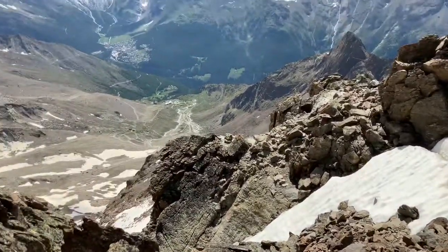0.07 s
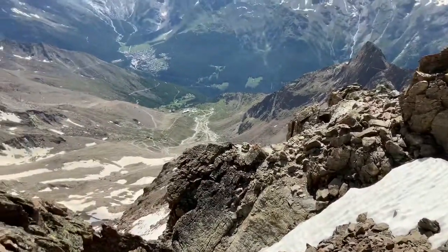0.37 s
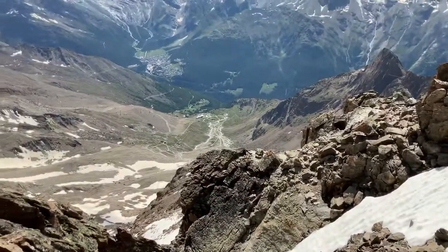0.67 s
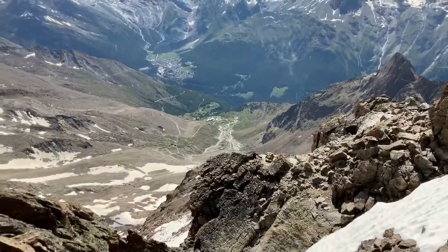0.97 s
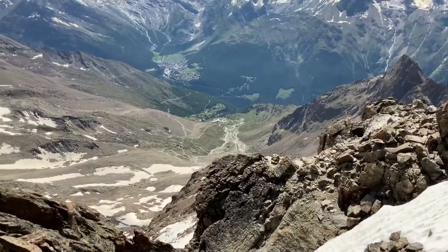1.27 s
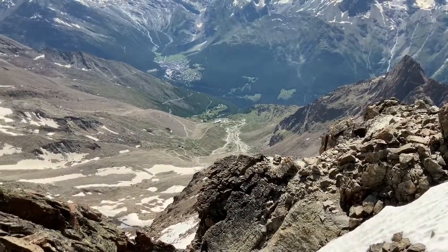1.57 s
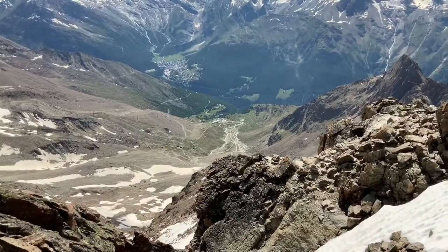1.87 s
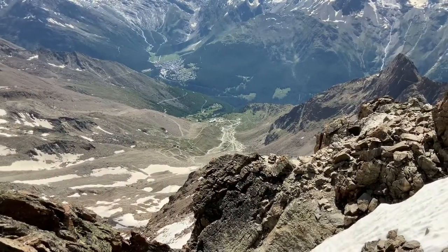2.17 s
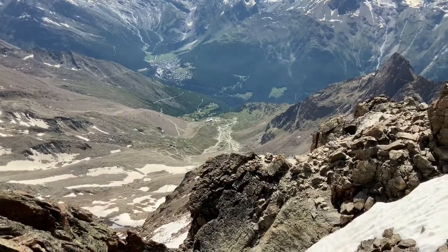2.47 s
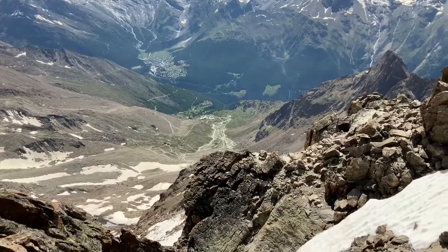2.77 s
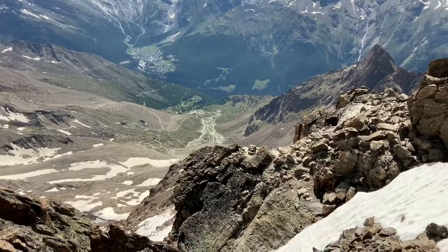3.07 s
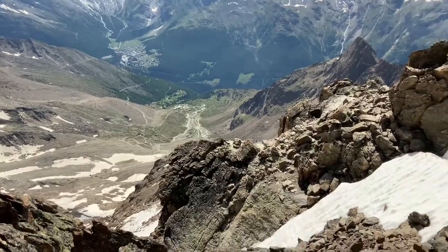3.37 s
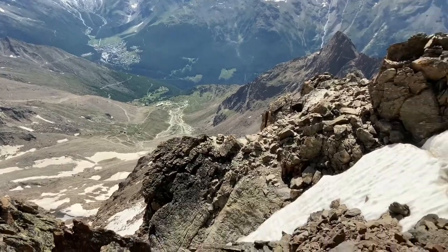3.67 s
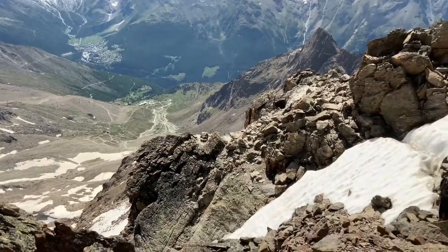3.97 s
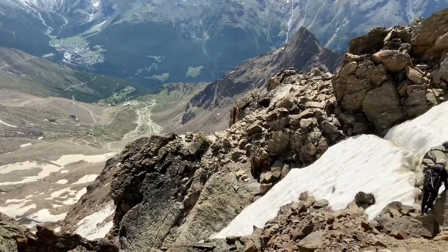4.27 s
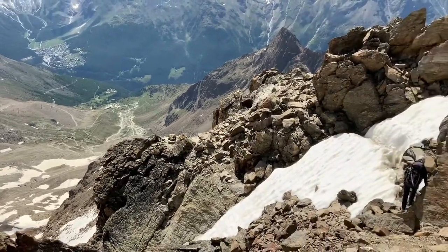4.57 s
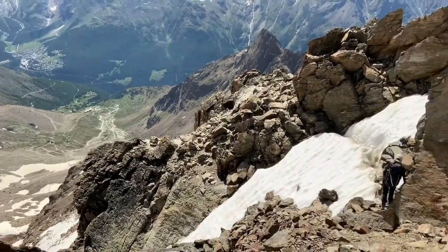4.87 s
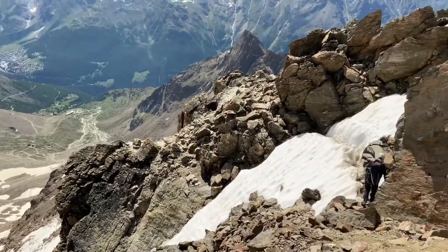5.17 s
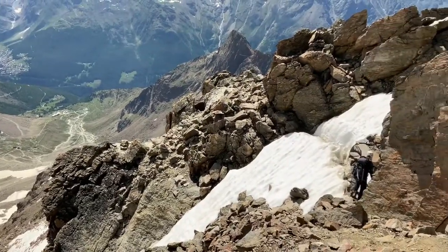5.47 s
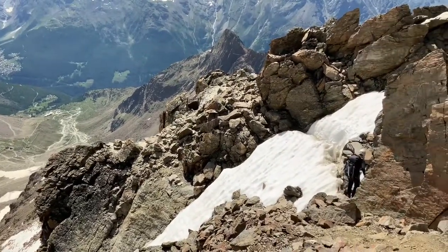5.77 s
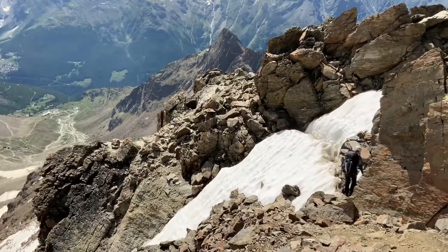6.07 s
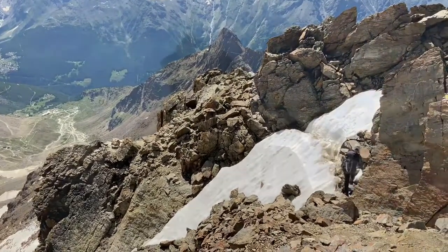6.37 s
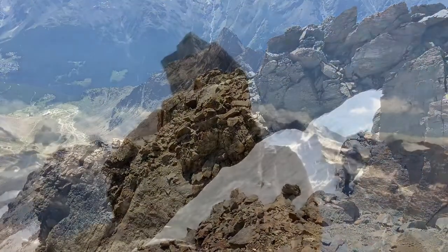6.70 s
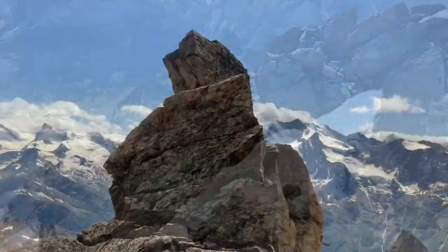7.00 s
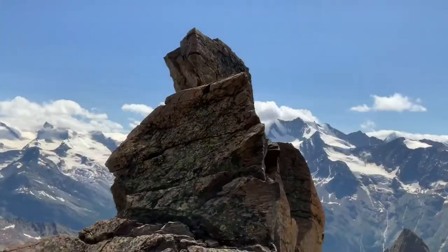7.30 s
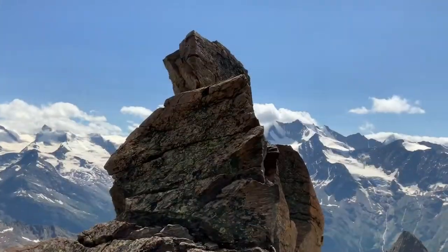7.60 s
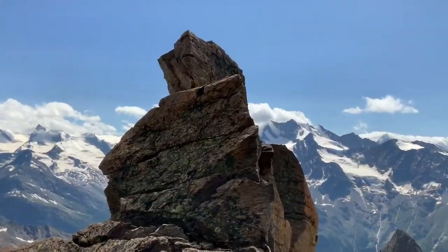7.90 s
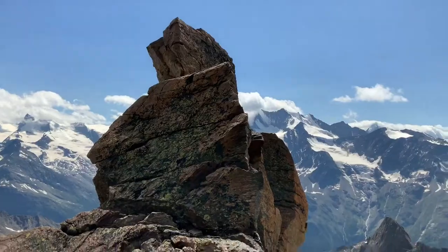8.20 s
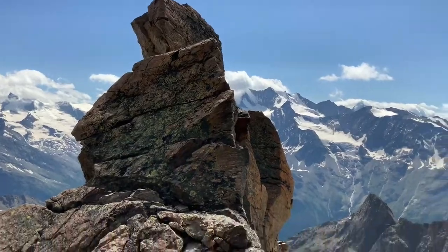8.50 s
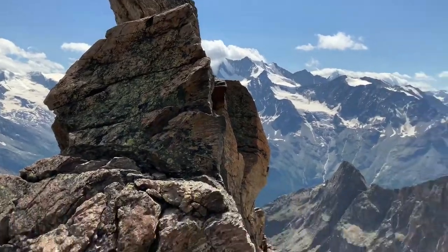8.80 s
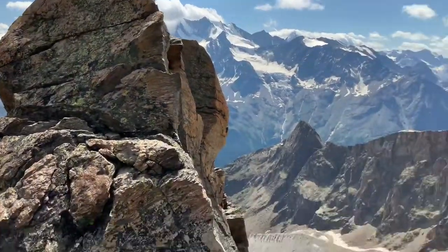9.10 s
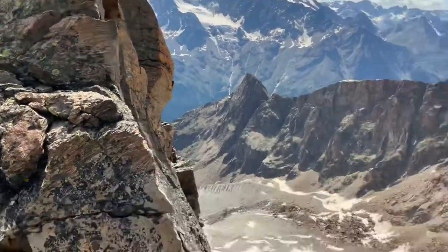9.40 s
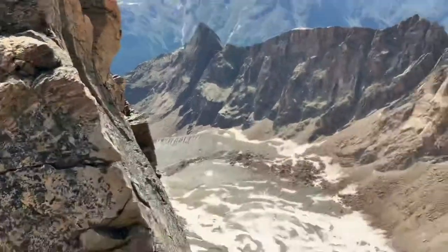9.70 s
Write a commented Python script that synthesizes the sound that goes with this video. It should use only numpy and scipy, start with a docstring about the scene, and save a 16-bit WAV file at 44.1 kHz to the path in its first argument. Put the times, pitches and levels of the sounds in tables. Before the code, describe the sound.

Quiet distant wind with soft taps and sleeve rustle, then gusts suddenly hit the microphone with a lumpy, thumping rumble.

```python
"""A high rocky ridge in the wind, heard through the two microphone ports of a small hand-held camera.
First there is shelter: a far wash of air, soft puffs, a sleeve sliding on itself, a hand rubbing and
knocking on the casing. After six seconds the wind reaches the ports and gusts strike them: eddies make
a lumpy rumble with deep thumps and sudden gaps, and the fastest flow tears into short rasps."""
import sys
import numpy as np
from scipy import signal
from scipy.fft import rfft, irfft
from scipy.io import wavfile
from scipy.ndimage import uniform_filter1d

SR = 44100
rng = np.random.default_rng(int(sys.argv[2]) if len(sys.argv) > 2 else 0)


def master_out(mix):
    """Clip the mix to full scale and print it as 16-bit PCM to the path in sys.argv[1]."""
    frames = np.transpose(np.atleast_2d(mix))
    ceiling = np.clip(frames, -1, 1)
    pcm = np.round(ceiling * 32767).astype(np.int16)
    wavfile.write(sys.argv[1], SR, pcm)


N = 434385
T, HZ = np.arange(N) / SR, np.fft.rfftfreq(N, 1 / SR)

# tone of the flow tearing off the casing: (frequency [Hz], level [dB])
TEAR_SPECTRUM = [(80, -24), (450, 7.5), (630, 11), (790, 4), (950, -1.5), (1100, -4), (1270, -13.5),
                 (1450, -15.5), (1720, -20.5), (2150, -30), (2650, -35.5), (3200, -55), (5000, -72),
                 (12000, -91.5)]
# light air in the shelter: (time [s], slow eddies [dB], roar beyond the rocks [dB])
LIGHT_AIR = [(0, -47.5, -70), (1.1, -53.5, -63), (1.55, -54, -71), (1.82, -47, -63.5), (2.15, -53, -70.5),
             (2.65, -60.5, -63.5), (3.2, -52, -60), (3.7, -65, -64.5), (5, -80, -61), (6.1, -81, -63)]


def buffeting(churn_db=-4, tear_db=-19, flick_db=-17, steepness=1.29, lull_s=0.014):
    """Wind and gusts drive eddies of three sizes on the ports; the smallest grow fastest with the flow."""
    # steady push of the wind: (time [s], level [dB])
    push = [(6.15, -52), (6.25, -42.5), (6.53, -28), (6.66, -31.5), (6.85, -22), (7.36, -29), (7.85, -23),
            (7.98, -30), (8.2, -25.5), (8.4, -23), (8.68, -28), (9.62, -27), (9.85, -34.5)]
    # gusts striking the ports: (time [s], peak [dB], length [s], hollow body against rumble [dB])
    gusts = [(6.403, -31, 0.031, -1), (6.479, -36.5, 0.019, 7.5), (6.631, -32, 0.0081, 19.5),
             (6.691, -21.5, 0.037, 6), (6.819, -17, 0.039, 1), (6.868, -14.5, 0.03, -5),
             (6.979, -13.5, 0.009, 2.5), (7.015, -23, 0.037, 6.5), (7.119, -19.5, 0.03, 4),
             (7.163, -17, 0.021, 0), (7.27, -18, 0.043, -8), (7.44, -16, 0.011, -0.5),
             (7.522, -16.5, 0.051, -2), (7.702, -25, 0.0055, 8), (7.759, -19.5, 0.045, 1.5),
             (7.847, -23.5, 0.085, -2), (8.152, -26, 0.049, -15.5), (8.248, -14, 0.0086, 1),
             (8.345, -31.5, 0.051, 3), (8.407, -19, 0.01, 0.5), (8.467, -24, 0.02, 8),
             (8.572, -18, 0.11, -8.5), (8.659, -24.5, 0.047, -2.5), (8.906, -23, 0.052, 2),
             (9.074, -31.5, 0.071, 4.5), (9.285, -17.5, 0.018, -17), (9.4, -24.5, 0.068, -6.5),
             (9.745, -20, 0.052, -9)]
    # the flow lifts off the ports and leaves a gap: (time [s])
    lulls = [6.585, 6.765, 6.935, 7.075, 7.214, 7.335, 7.394, 7.595, 7.965, 8.072, 8.216, 8.613, 8.76,
             8.834, 9.131, 9.656]
    # rumble of the large eddies: (frequency [Hz], level [dB])
    rumble_spectrum = [(12, -11), (22, -9.5), (45, 1.5), (90, 1), (130, -2.5), (190, -8.5), (400, -74),
                       (3000, -130)]
    # hollow body of the medium eddies: (frequency [Hz], level [dB])
    body_spectrum = [(70, -22), (145, -4), (230, -1), (305, -3), (380, -8.5), (480, -16), (700, -31),
                     (4000, -120)]
    wind = amp(follow(push)[0]) * np.clip((T - push[0][0]) * 20, 0, 1)
    gust_rumble, gust_body = bursts(gusts, rise=0.89, fall=0.82)
    fits = abs(flicks())  # between gusts the churn comes in separate puffs
    churn_level = wind * (wind / wind.max()) ** 0.13 * amp(churn_db) * np.sqrt(fits)
    rumble_level, body_level = np.hypot(wind, gust_rumble), np.hypot(churn_level, gust_body)
    peak = body_level.max()
    tear_level = peak * (body_level / peak) ** steepness * amp(tear_db)
    flick_level = peak * (wind / peak) ** steepness * amp(flick_db) * fits

    flutter = wander(rate_hz=41)  # shared by all three sizes
    rumble = ports(tone(rumble_spectrum), right_db=0.5) * amp(3 * flutter)
    body = ports(tone(body_spectrum), right_db=4.5) * amp(4.5 * flutter)
    tear = ports(tone(TEAR_SPECTRUM) * below(1800, order=4), right_db=3.5) * amp(4 * flutter)
    flick_band = below(1200, order=16) * (1 - below(110, order=4))
    flicker = ports(tone(TEAR_SPECTRUM) * flick_band, right_db=-1.1)
    churn = (steadied(body, span_s=0.056) * body_level
             + steadied(tear, span_s=0.0088) * tear_level
             + flicker * flick_level)
    gap = sum(np.exp(-((T - s) / lull_s) ** 2) for s in lulls)
    return steadied(rumble, span_s=0.03) * rumble_level * amp(-1.5 * gap) + churn * amp(-7.5 * gap)


def flicks(per_s=69, flick_s=0.0032, spread_db=5.5):
    """Envelope of small eddies passing in fits: brief flicks of uneven size at random moments."""
    chance, size = rng.random(N), np.minimum(rng.exponential(1, N), 2)
    hits = (chance < per_s / SR) * amp(spread_db * size)
    t = np.arange(2048) / SR
    shape = t * np.exp(-(t / flick_s / 2) ** 2)
    return unit_rms(signal.oaconvolve(hits, shape)[:N])


def thumps(width_octaves=0.26):
    """A large eddy covers both ports at once and lands one deep blow."""
    # single large eddies: (time [s], peak [dB], centre [Hz], length [s])
    blows = [(6.733, -16, 68, 0.012), (6.816, -11, 103.5, 0.023), (6.971, -20, 60.7, 0.027),
             (7.121, -15.5, 312, 0.015), (7.15, -12, 82, 0.0065), (7.175, -4, 138, 0.005),
             (7.284, -19.5, 64, 0.058), (7.435, -16, 62, 0.015), (7.915, -14, 69.8, 0.016),
             (8.245, -16, 139.2, 0.013), (8.275, -11, 49.3, 0.02), (8.397, -13.5, 129, 0.0089),
             (8.482, -18.5, 80, 0.0073), (8.565, -19, 87.4, 0.03), (8.914, -33, 74, 0.023),
             (9.177, -14.5, 56, 0.0084), (9.23, -20.5, 56, 0.018), (9.694, -13, 70.7, 0.017),
             (9.857, -7, 49, 0.022)]
    flow = ports(below(700), right_db=1.5)
    return swells(flow, [(*blow, width_octaves) for blow in blows])


def rasps(dull_db=5, bright_db=-7.5):
    """The fastest eddies tear off the casing in short bursts: a dull body and a top that rings the ports."""
    # tears in the flow: (time [s], peak [dB], length [s], treble against body [dB])
    tears = [(6.41, -47.5, 0.022, -3), (6.526, -25.5, 0.0059, -3), (6.625, -43, 0.16, -1),
             (6.745, -32, 0.0032, -8.5), (6.807, -37, 0.072, 3), (6.865, -28, 0.0082, 17.5),
             (6.971, -40.5, 0.011, -4), (7.117, -33.5, 0.023, -10.5), (7.438, -40, 0.005, -3),
             (7.51, -48.5, 0.014, 12.5), (7.611, -45, 0.0073, -3.5), (7.762, -35.5, 0.012, -10),
             (7.825, -29, 0.015, -12), (7.843, -32.5, 0.0036, 3.5), (7.894, -29.5, 0.0026, -9),
             (8, -35.5, 0.005, -32), (8.033, -46, 0.007, -19), (8.111, -46, 0.0047, -22),
             (8.171, -43, 0.0059, -8), (8.24, -48.5, 0.0029, 5), (8.383, -27.5, 0.0038, -16.5),
             (8.401, -35, 0.013, -11), (8.488, -34, 0.018, -6), (8.636, -32.5, 0.0085, -9),
             (8.663, -34.5, 0.025, -13), (8.702, -37, 0.011, -3.5), (8.803, -37, 0.024, 5),
             (8.882, -22, 0.0072, -3), (8.907, -22.5, 0.011, 0.5), (9.029, -32.5, 0.0023, -26),
             (9.057, -36, 0.024, -7), (9.168, -29.5, 0.0094, -31), (9.298, -31, 0.0064, -25),
             (9.423, -33, 0.021, -15), (9.441, -30.5, 0.011, 9), (9.512, -37.5, 0.029, -9),
             (9.539, -21.5, 0.004, -3)]
    tearing = ports(tone(TEAR_SPECTRUM) * (1 - below(150, order=4)), right_db=2.5)
    dull = filtered(steadied(tearing, span_s=0.006), below(1100, order=16))
    top = unit_rms(filtered(tearing, 1 - below(870, order=32)))
    bright = steadied(top, span_s=0.006)
    body, treble = bursts(tears, rise=0.34, fall=0.98)
    return amp(dull_db) * body * dull + amp(bright_db) * treble * bright


def breeze(eddies_db=-5, lumpy_db=6, puff_s=0.013):
    """Slow eddies nudge the sheltered ports, now and then with a stronger puff."""
    # tone of the slow eddies: (frequency [Hz], level [dB])
    air_spectrum = [(12, -25.5), (25, 4.5), (50, 2.5), (80, -3.5), (110, -29), (1500, -100)]
    # soft puffs: (time [s], peak [dB], upper edge [Hz])
    puffs = [(.27, -41.5, 72), (0.494, -42, 78.4), (0.992, -39.5, 62), (1.078, -35.5, 147),
             (1.809, -40.5, 52), (1.971, -48, 166), (3.6, -51.5, 262)]
    air = ports(tone(air_spectrum), right_db=-5) * amp(lumpy_db * wander(rate_hz=4.9))
    out = amp(follow(LIGHT_AIR)[0] + eddies_db) * steadied(air, span_s=0.18)
    flow = ports(below(320), right_db=-2)
    hz = np.fft.rfftfreq(4096, 1 / SR)
    for s, db, edge_hz in puffs:
        at = np.arange(4096) + int(s * SR) - len(hz)
        band = hz / (hz + 20) / (1 + (hz / edge_hz) ** 4)
        puff = unit_rms(filtered(flow[:, at], band))
        out[:, at] += amp(db) * puff * np.exp(-((T[at] - s) / puff_s) ** 2)
    return out


def knocks(ring_db=-5, tick_db=-9, tick_s=0.004, rise_s=0.002):
    """Fingers shift on the casing: a dry tick, then a hollow clack that dies within a few cycles."""
    # finger taps: (time [s], level [dB], treble against body [dB], pitch against the modes [ratio])
    taps = [(.419, -53.5, -14, 1.16), (0.561, -48, -23, 0.87), (1.134, -55, 4, 1.43),
            (1.244, -40.5, -0.5, 1), (1.351, -46.5, -12, 1.08), (2.924, -45.5, -0.5, 1.08),
            (2.97, -53, -4, 1.35), (3.04, -44, -20, 0.97), (3.339, -44, 3, 1.15)]
    # casing modes: (frequency [Hz], level [dB], t60 [s])
    modes = [(537, 25, 0.0094), (706, -4, 0.054)]
    out, t = np.zeros((2, N)), np.arange(4096) / SR
    tick_noise = ports(below(2400, order=4), right_db=3.5)
    attack = 1 - np.exp(-(t / rise_s) ** 2)
    for s, db, treble_db, pitch in taps:
        at = int(s * SR) + np.arange(len(t))
        ring = sum(amp(mode_db - 60 * t / t60) * np.sin(2 * np.pi * hz * pitch * t + rng.random((2, 1)))
                   for hz, mode_db, t60 in modes)
        tick = amp(treble_db + tick_db) * tick_noise[:, at] * np.exp(-t / tick_s)
        out[:, at] += amp(db) * (amp(ring_db) * ring * attack + tick)
    return out


def sleeve(rub_db=11, crinkle_db=-7):
    """Jacket fabric slides on itself: hiss from the weave, snapping creases, a dull rub where it presses."""
    # sleeve strokes: (start [s], length [s], hiss [dB], rub [dB])
    moves = [(0, 0.74, -68.5, -76.5), (0.208, 0.06, -62.5, -73.5), (0.753, 0.53, -78, -79.5),
             (2.966, 0.16, -67.5, -74.5), (3.146, 0.24, -69.5, -70.5), (3.422, 0.55, -70.5, -75.5),
             (3.748, 0.24, -68, -79), (4.186, 0.94, -76, -77), (4.613, 0.32, -74, -73),
             (5.192, 0.18, -75, -80), (5.566, 0.014, -79.5, -88), (8.546, 0.94, -74, -76.5),
             (8.943, 0.038, -67, -62), (9.367, 0.37, -69, -67.5)]
    # hiss of the weave: (frequency [Hz], level [dB])
    weave_spectrum = [(1000, -30), (3700, -5.5), (4450, -2.5), (5300, -2), (6800, 0), (9300, 0.5),
                      (10500, -10.5), (13000, -13), (16000, -36)]
    # rub of pressed cloth: (frequency [Hz], level [dB])
    rub_spectrum = [(50, -8.5), (330, 9), (520, 14), (800, 9.5), (1200, 1), (2800, -3.5), (5500, -10.5),
                    (15000, -41.5)]
    speed = strokes([(s, length, db) for s, length, db, _ in moves])
    pressure = strokes([(s, length, db) for s, length, _, db in moves])
    hiss = speed * (ports(tone(weave_spectrum), right_db=5) + amp(crinkle_db) * crinkles())
    rub = pressure * amp(rub_db) * ports(tone(rub_spectrum), right_db=2)
    grain = amp(1.55 * wander(rate_hz=910) + 1.5 * wander(rate_hz=10))  # threads catch and slip
    return unit_rms(grain) * (hiss + rub)


def crinkles(per_s=900, low_hz=2600, high_hz=9200, cycles=1.9, spread_db=3.5):
    """Tiny creases snap at random moments, each with its own pitch, size and side."""
    out, t = np.zeros((2, N)), np.arange(-64, 64) / SR
    for when, pitch, size, side in rng.random((int(per_s * N / SR), 4)):
        hz, at = low_hz + pitch * (high_hz - low_hz), int(when * (N - len(t)))
        snap = np.sin(2 * np.pi * hz * t) * np.exp(-(2 * hz * t / cycles) ** 2)
        level = amp(spread_db * min(-np.log(1 - size), 3.5))
        out[:, at:at + len(t)] += np.outer([side, 1], snap) * level
    return unit_rms(out)


def hand(rough_db=3, drift=0.025):
    """Skin drags unevenly over the casing with a hollow, slightly wavering ring."""
    # slides beside the ports: (start [s], length [s], level [dB], ring [Hz])
    slides = [(3.12, 0.26, -71, 1576), (3.226, 0.16, -68.5, 795), (8.807, 0.15, -71, 3100),
              (9.395, 0.26, -62.5, 1710), (9.405, 0.34, -70.5, 2890)]
    drag = ports(1, right_db=2.5)
    shift = 1 + drift * wander(rate_hz=16)
    grip = unit_rms(amp(rough_db * wander(rate_hz=100)))
    out = np.zeros((2, N))
    for s, length, db, ring_hz in slides:
        level = strokes([(s, length, db)], fall_s=0.057)
        on = level > 0
        ring = resonate(drag[:, on], ring_hz * shift[on], width_hz=0.09 * ring_hz)
        out[:, on] += level[on] * unit_rms(ring)
    return out * grip


def scuffs():
    """Cloth and grit scrape and snap, each time in a brief swell of noise."""
    # scrapes: (time [s], peak [dB], centre [Hz], length [s], width [octaves])
    scrapes = [(0.925, -64, 3250, 0.053, 0.93), (1.036, -61.5, 1760, 0.0063, 0.36),
               (5.205, -58, 1240, 0.0093, 0.31), (5.242, -58.5, 1490, 0.02, 1),
               (5.725, -65.5, 2100, 0.029, 0.96), (5.73, -69.5, 12000, 0.041, 0.43),
               (6.931, -66.5, 3400, 0.014, 0.34), (7.023, -47.5, 2960, 0.0021, 0.24),
               (7.023, -60, 10400, 0.0012, 0.12), (7.355, -79, 3790, 0.018, 0.2),
               (7.953, -51.5, 5860, 0.0018, 0.27), (8.032, -67, 3700, 0.003, 0.09),
               (8.962, -58, 10100, 0.0025, 0.28), (8.963, -50.5, 3020, 0.005, 0.15)]
    return swells(ports(1, right_db=3), scrapes)


def far_air(wash_db=-70, swell_db=1):
    """Wind washes over distant slopes, roars beyond the rocks and hisses on the bare crest."""
    # wash on the slopes: (frequency [Hz], level [dB])
    wash_spectrum = [(40, -9.5), (130, -20.5), (180, -6), (270, -2), (350, -16), (600, -11.5), (950, -18),
                     (1300, -29), (2500, -35), (9000, -33), (15500, -44)]
    # roar beyond the rocks: (frequency [Hz], level [dB])
    roar_spectrum = [(20, -12), (65, 2), (200, -6), (290, -15), (400, -15.5), (4000, -88)]
    # hiss on the crest: (frequency [Hz], level [dB])
    hiss_spectrum = [(300, -7), (1600, 2), (2400, -5), (3400, -10), (5000, -23.5), (16000, -60.5)]
    # wind over the crest: (time [s], level [dB])
    crest_wind = [(6.15, -96.5), (6.4, -70), (7.15, -66), (7.6, -72.5), (9.83, -67.5)]
    wash = ports(tone(wash_spectrum), right_db=0.5) * amp(wash_db)
    roar = ports(tone(roar_spectrum), right_db=1.5) * amp(follow(LIGHT_AIR)[1])
    hiss = ports(tone(hiss_spectrum), right_db=1.5) * amp(follow(crest_wind)[0])
    return (wash + roar + hiss) * amp(swell_db * wander(rate_hz=10))


def ports(gain, right_db, crossfeed_s=48 / SR):
    """Stereo noise coloured by the port cavities: partly shared, partly separate, widened by crossfeed."""
    # sound both ports get at once: (frequency [Hz], share [ratio])
    direct = [(30, 0.87), (70, 0.9), (120, 0.2), (250, 0.63), (500, 0.16), (2000, 0.16), (12000, 0.035)]
    # right channel fed into the left about 1 ms later, widening the stereo: (frequency [Hz], share [ratio])
    crossfeed = [(30, 0.023), (550, 0.15), (950, 0.63), (1450, 0.037), (2700, 0.23), (5000, 0.25),
                 (13000, 0.23)]
    # cavities behind the ports: (frequency [Hz], width [Hz], lift [dB])
    cavities = [(1660, 200, 4), (2950, 400, 4), (4550, 480, 5.5), (6750, 550, 4)]
    lift_db = sum(db / (1 + (2 * (HZ - hz) / width) ** 2) for hz, width, db in cavities)
    right, separate = rfft(rng.standard_normal((2, N)))
    shared = across_hz(direct) + across_hz(crossfeed) * np.exp(-2j * np.pi * HZ * crossfeed_s)
    left = shared * right + np.sqrt(np.clip(1 - abs(shared) ** 2, 0.02, 1)) * separate
    pair = irfft(np.array([left, right]) * gain * amp(lift_db), N)
    return unit_rms(pair * amp([[0], [right_db]]))


def bursts(rows, rise, fall):
    """Envelopes of blows, plain and with each row's dB offset; rise and fall are shares of the length."""
    power = np.zeros((2, N))
    for s, db, length, offset_db in rows:
        near = slice(int((s - 0.25) * SR), int((s + 0.25) * SR))
        age = (T[near] - s) / length
        shape = np.exp(-(age / np.where(age < 0, rise, fall)) ** 2)
        power[:, near] += np.outer(amp([db, db + offset_db]), shape) ** 2
    return np.sqrt(power)


def strokes(rows, rise_s=0.35, fall_s=0.27):
    """Envelope of sliding moves: each speeds up, holds and comes to rest."""
    moves = [amp(db) * np.interp(T, [s - rise_s, s, s + length, s + length + fall_s], [0, 1, 1, 0]) ** 2
             for s, length, db in rows]
    return np.max(moves, axis=0)


def swells(noise, rows):
    """Short bell-shaped swells of noise, each in a band around its own pitch."""
    out, hz = np.zeros((2, N)), np.fft.rfftfreq(8192, 1 / SR) + 1
    for s, db, centre_hz, length, octaves in rows:
        at = np.arange(8192) + int(s * SR) - len(hz)
        shape, heard = np.exp(-((at / SR - s) / length) ** 2), at < N
        band = filtered(noise[:, at % N], np.exp(-(np.log2(hz / centre_hz) / octaves) ** 2 / 2))
        swell = amp(db) * unit_rms(band * shape) * np.sqrt(np.mean(shape ** 2))
        out[:, at[heard]] += swell[:, heard]
    return out


def resonate(x, hz, width_hz):
    """A resonance that follows the pitch curve hz."""
    turn = np.exp(2j * np.pi * np.cumsum(hz) / SR)
    r = np.exp(-np.pi * width_hz / SR)
    return 2 * (turn * signal.lfilter([(1 - r) ** 2], [1, -2 * r, r * r], x / turn)).real


def steadied(x, span_s):
    """Levels out swells slower than span_s, so that an envelope can set the level."""
    size = int(span_s * SR)
    power = uniform_filter1d(uniform_filter1d((x ** 2).mean(0), size), size // 2)
    return x / np.sqrt(abs(power) + 0.0058)


def wander(rate_hz):
    """Smooth random drift of unit size."""
    return unit_rms(filtered(rng.standard_normal(N), below(rate_hz)))


def below(edge_hz, order=8):
    """Gain of a steep low-pass."""
    return 1 / np.sqrt(1 + (HZ / edge_hz) ** order)


def filtered(x, gain):
    return irfft(rfft(x) * gain, x.shape[-1])


def across_hz(points):
    """Points joined on a log-frequency axis."""
    hz, value = np.transpose(points)
    return np.interp(np.log(HZ + 1), np.log(hz + 1), value)


def tone(spectrum):
    """Gain of an EQ curve given in dB."""
    return amp(across_hz(spectrum))


def follow(rows):
    """Each column of an automation curve, at every sample."""
    s, *columns = np.transpose(rows)
    return [np.interp(T, s, column) for column in columns]


def amp(db):
    return 10 ** (np.asarray(db) / 20)


def unit_rms(x):
    return x / np.sqrt(np.mean(x ** 2) + 1e-20)


def scene():
    """Wind on the ports and far away, plus the small sounds of holding the camera."""
    wind = buffeting() + thumps() + rasps() + breeze() + far_air()
    return wind + sleeve() + hand() + scuffs() + knocks()


def record(dry, ceiling=0.67, low_cut_hz=16, high_cut_hz=15700):
    """The microphone sheds the deepest bass, rounds the largest peaks and loses the very top."""
    low_cut = signal.sosfilt(signal.butter(2, low_cut_hz, "high", fs=SR, output="sos"), dry)
    rounded = ceiling * np.tanh(low_cut / ceiling)
    band_limit = signal.firwin(511, high_cut_hz, window=("kaiser", 9), fs=SR)
    return signal.oaconvolve(rounded, band_limit[None], "same")


dry = scene()
out = record(dry)
master_out(out)
```